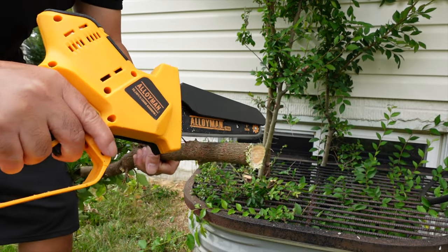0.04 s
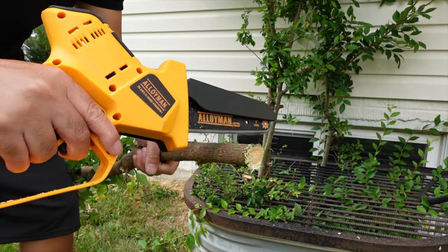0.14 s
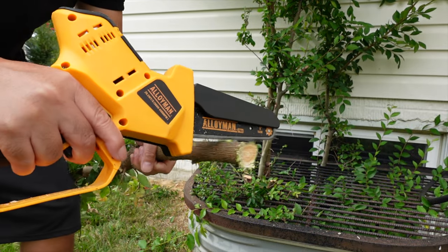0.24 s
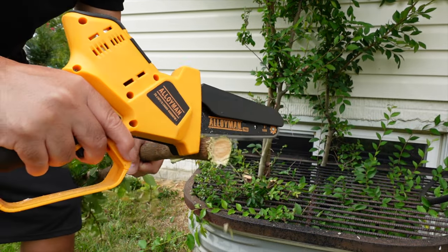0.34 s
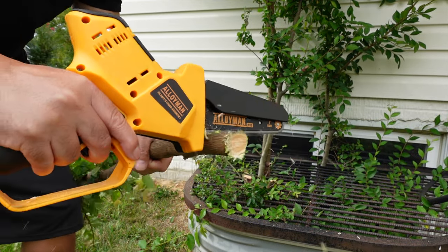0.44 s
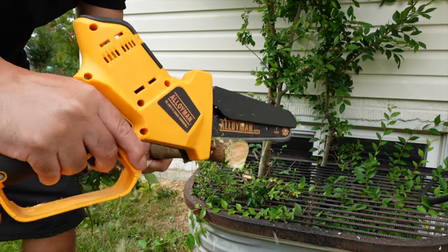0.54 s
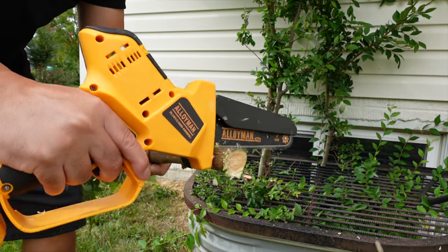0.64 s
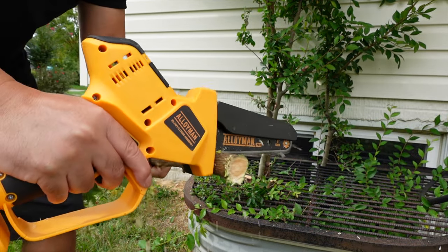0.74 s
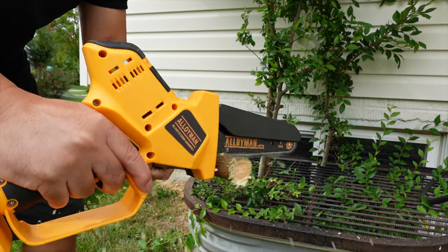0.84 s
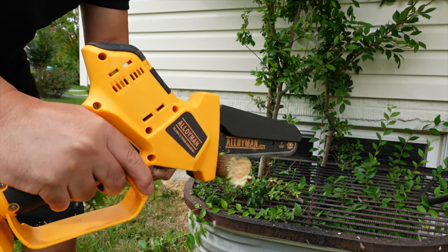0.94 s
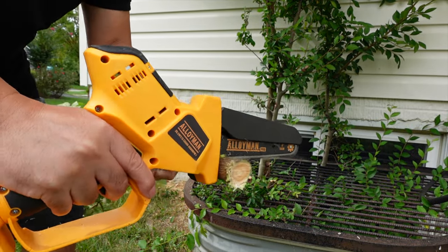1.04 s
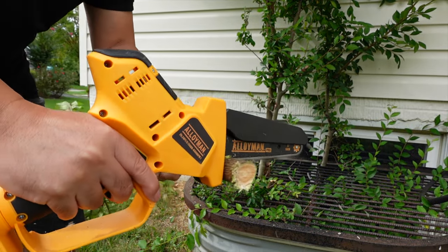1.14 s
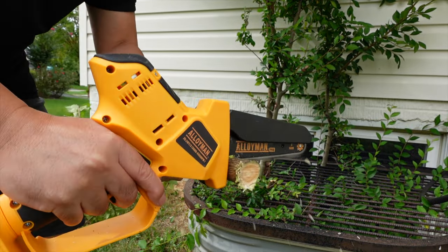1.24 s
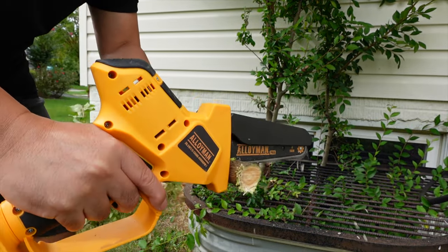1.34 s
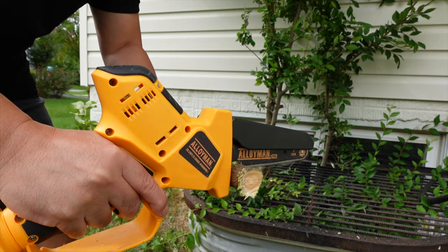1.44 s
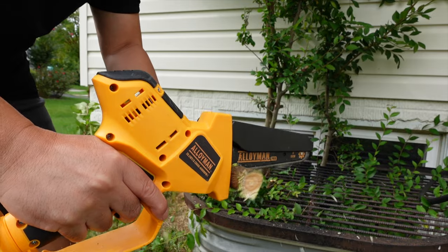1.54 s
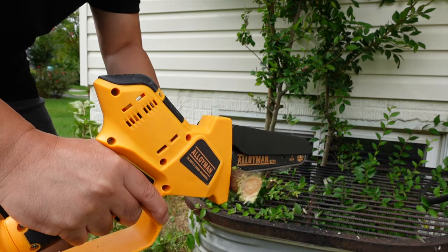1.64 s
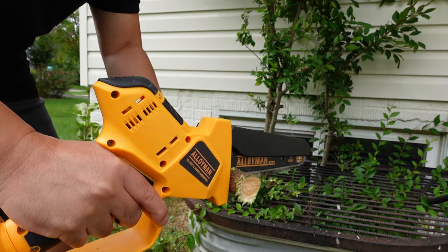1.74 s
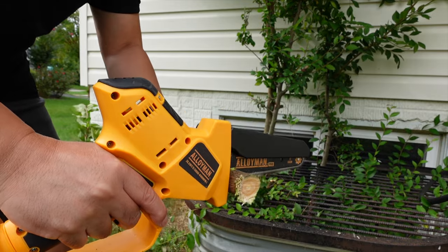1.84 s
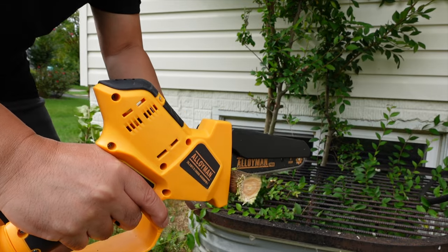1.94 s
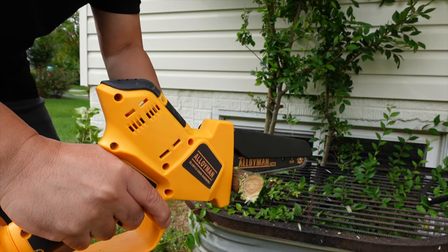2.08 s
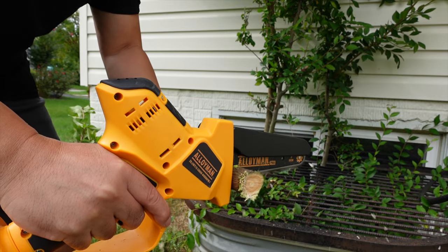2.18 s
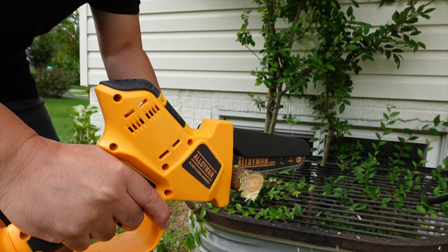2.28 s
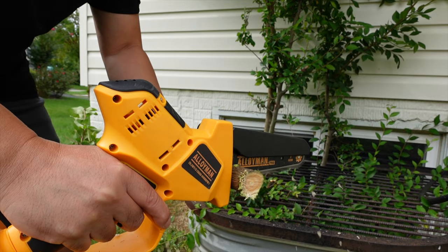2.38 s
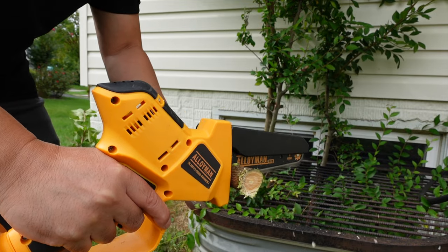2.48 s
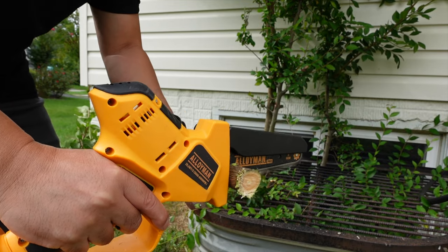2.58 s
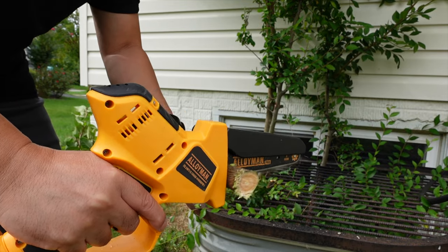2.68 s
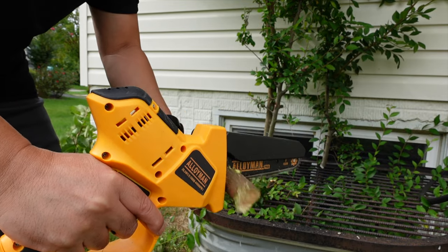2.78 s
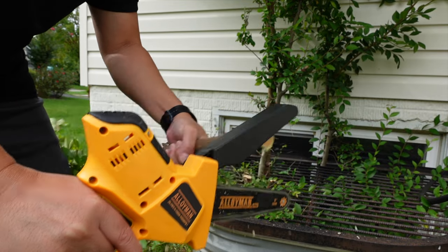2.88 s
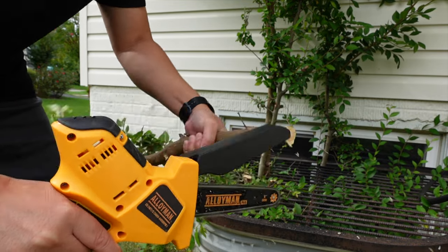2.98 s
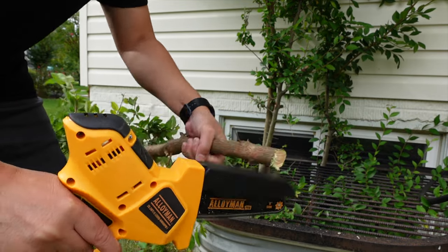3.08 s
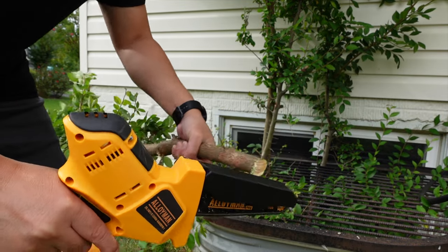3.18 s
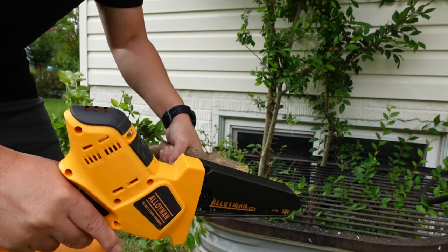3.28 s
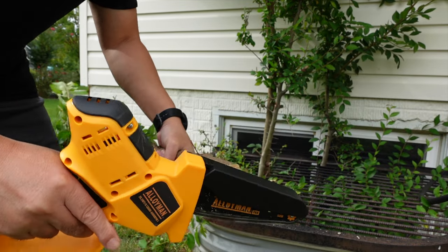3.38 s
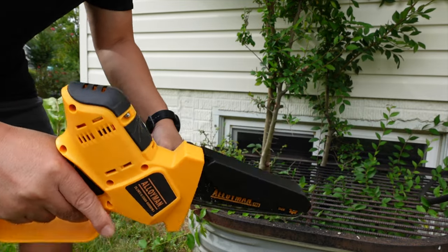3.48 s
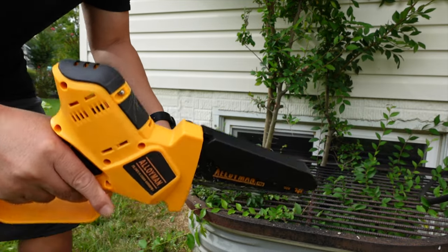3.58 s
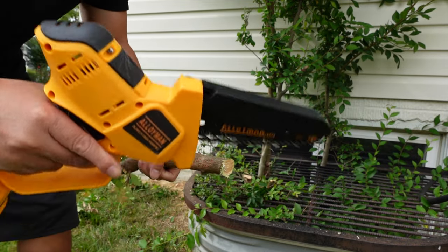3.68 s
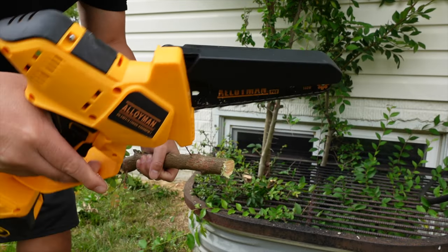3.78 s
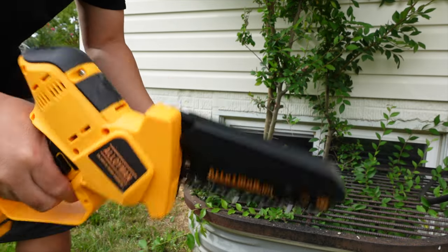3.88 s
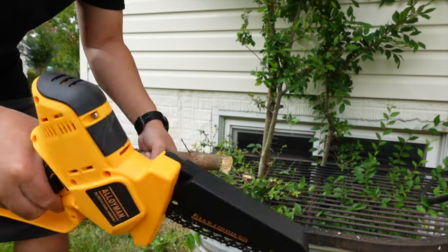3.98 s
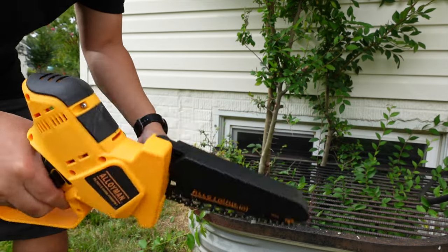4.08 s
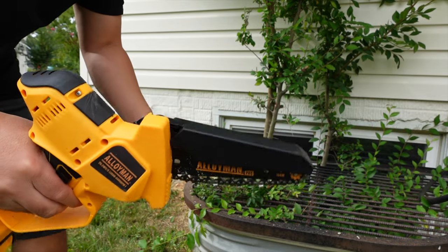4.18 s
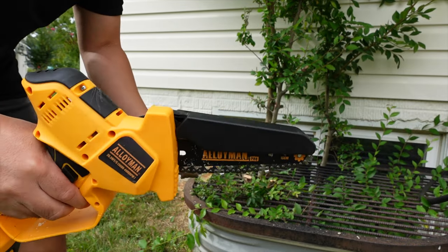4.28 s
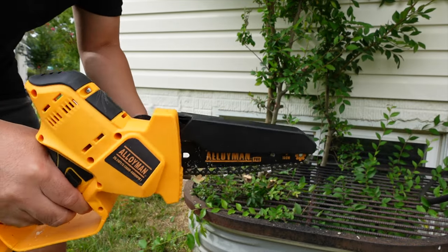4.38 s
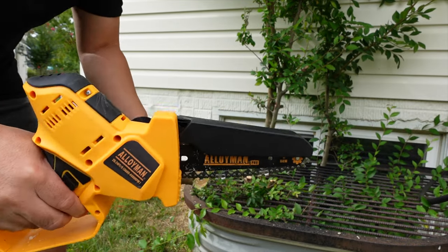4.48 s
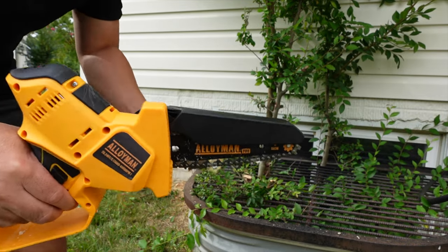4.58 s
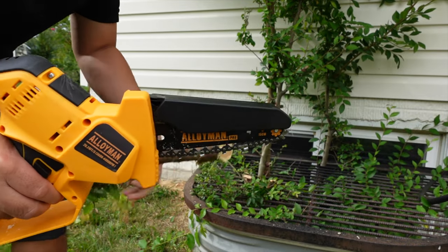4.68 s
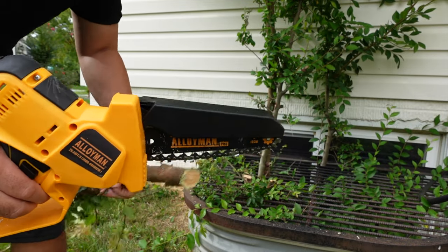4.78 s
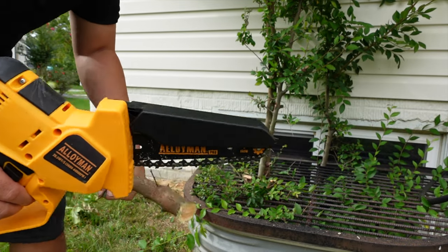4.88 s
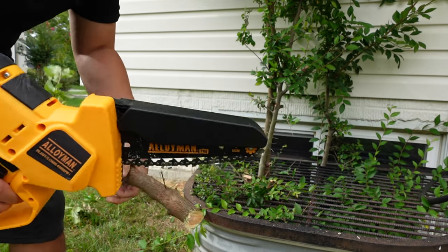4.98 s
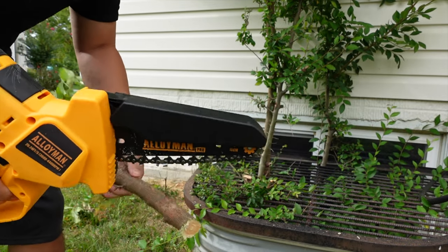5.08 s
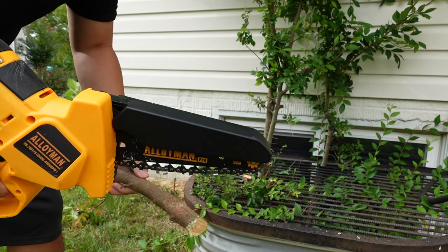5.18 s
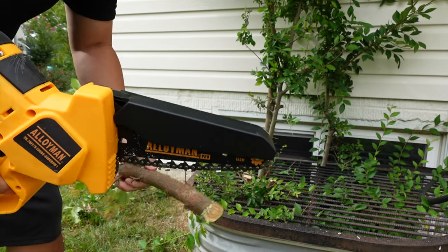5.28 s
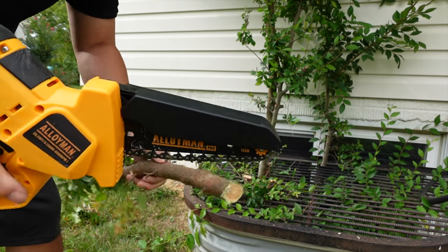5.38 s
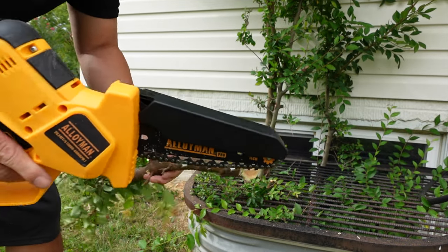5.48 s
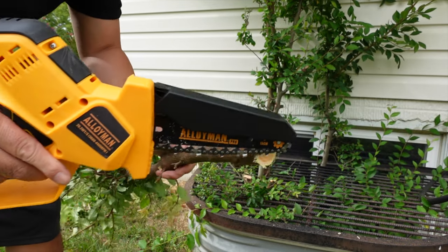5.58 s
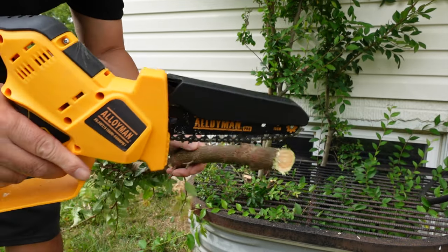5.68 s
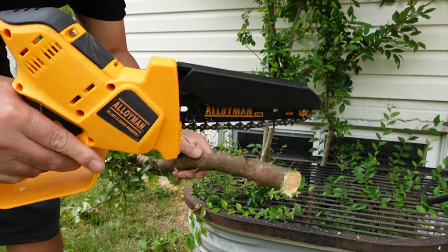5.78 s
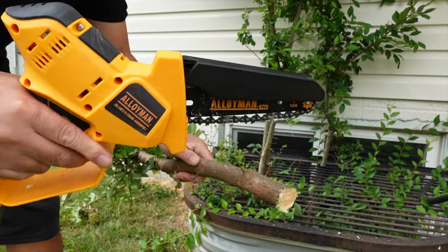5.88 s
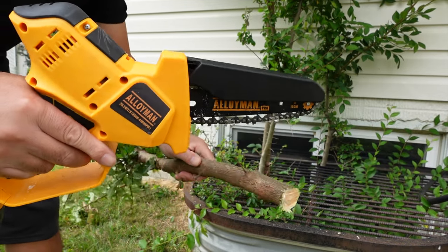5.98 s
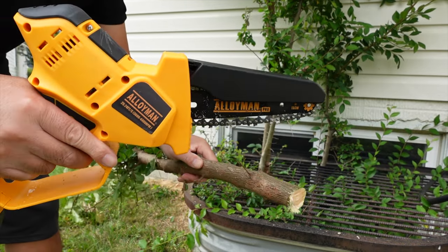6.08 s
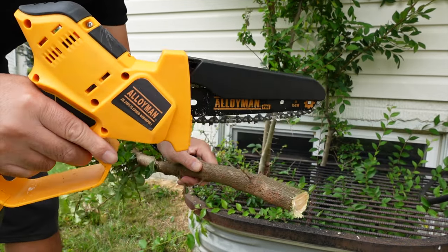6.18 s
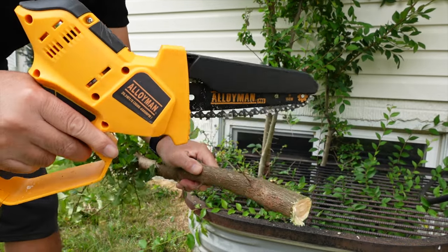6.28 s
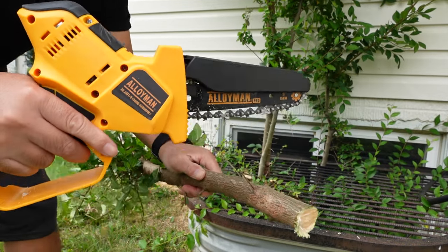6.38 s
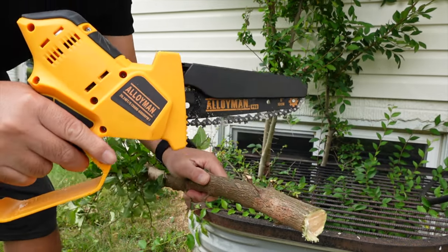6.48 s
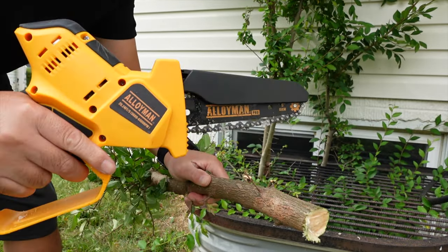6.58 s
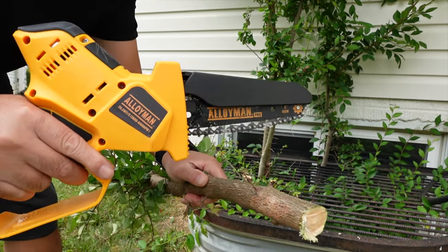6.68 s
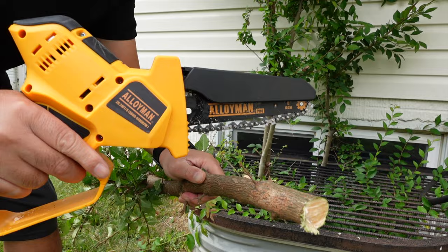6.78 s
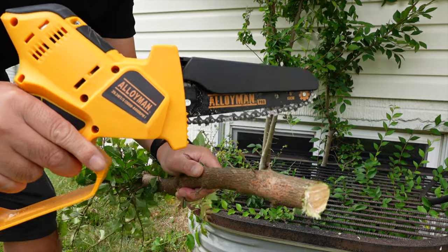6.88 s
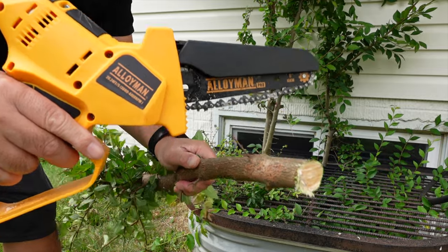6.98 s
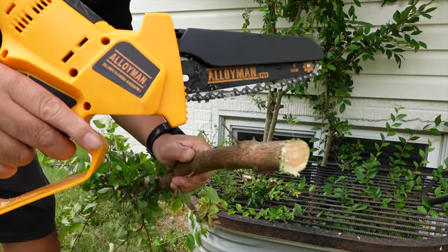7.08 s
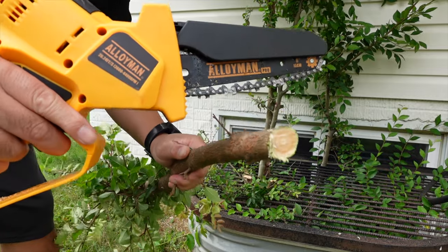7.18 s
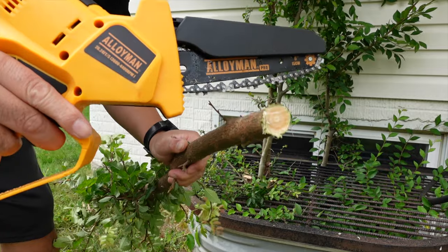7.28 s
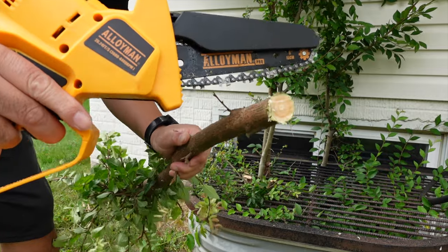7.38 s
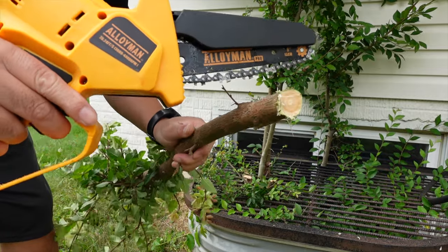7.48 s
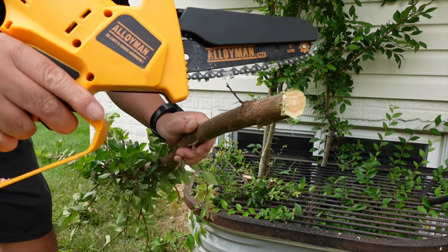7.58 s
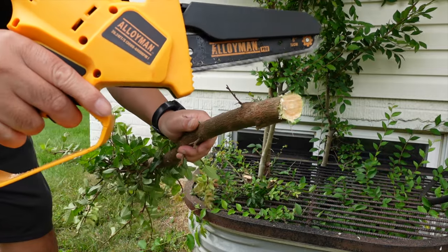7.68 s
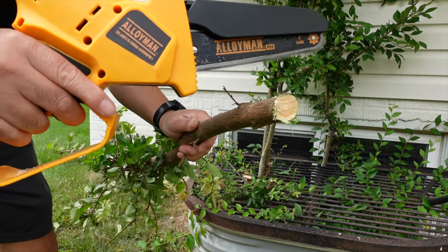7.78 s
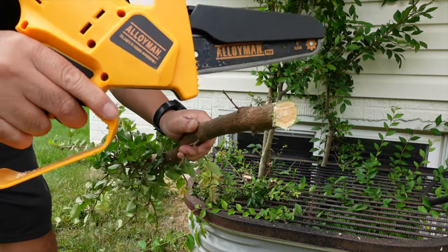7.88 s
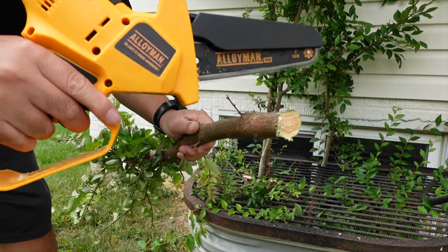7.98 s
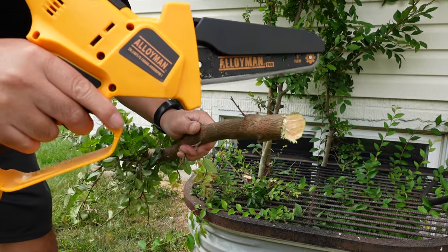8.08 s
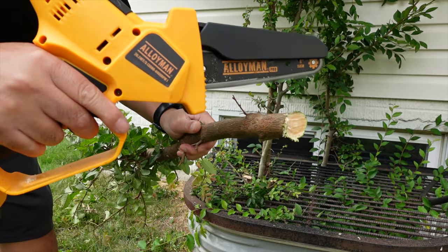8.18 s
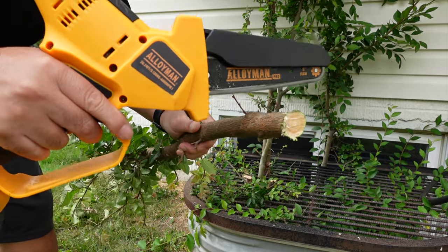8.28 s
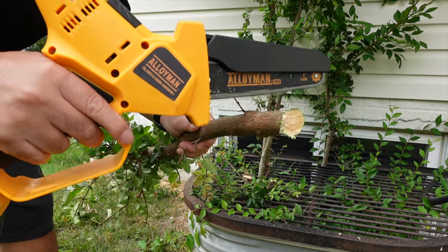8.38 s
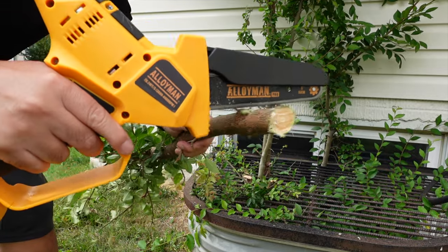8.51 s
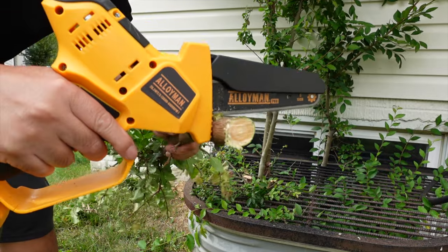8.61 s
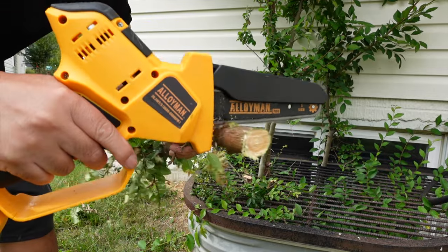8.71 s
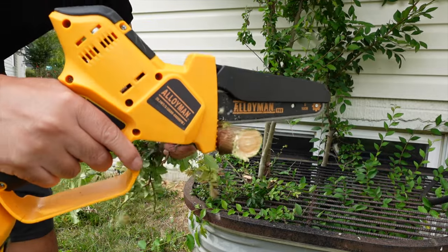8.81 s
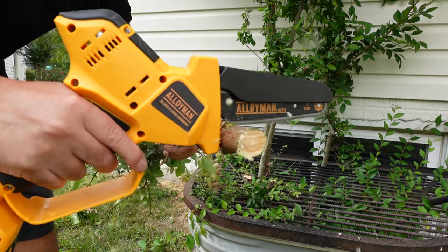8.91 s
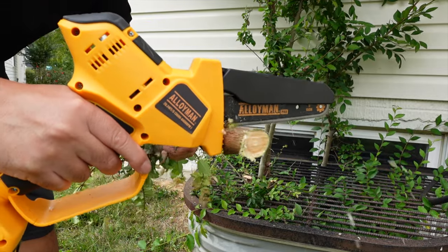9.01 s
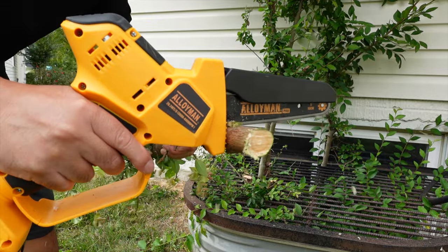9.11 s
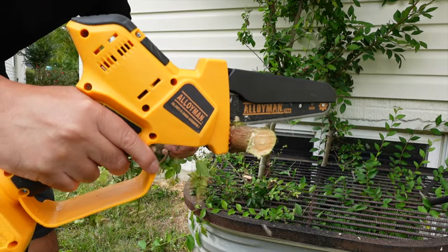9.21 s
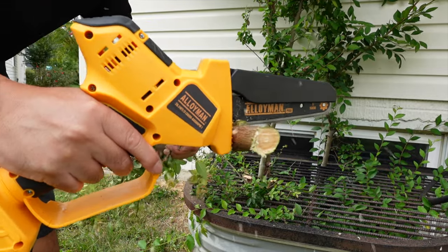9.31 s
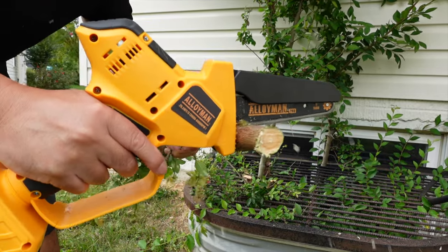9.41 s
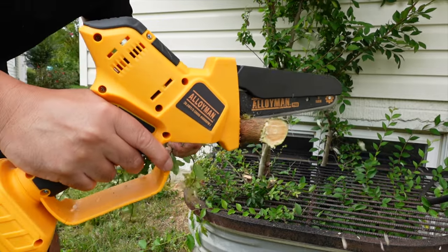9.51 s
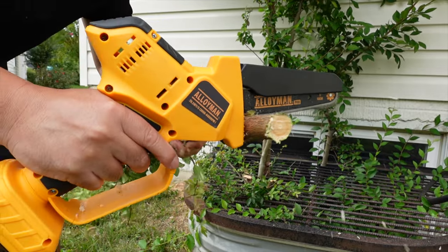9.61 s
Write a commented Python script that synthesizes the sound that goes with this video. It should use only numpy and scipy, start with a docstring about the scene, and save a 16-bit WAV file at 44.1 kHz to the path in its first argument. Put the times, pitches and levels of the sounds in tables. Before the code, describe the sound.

A small battery chainsaw rasps loudly through a branch, clatters to a stop, leaves rustle and twigs snap, then it restarts and cuts again.

```python
"""A small battery chainsaw, close by, cuts a thin branch, coasts to a stop, then starts and cuts again.
Its chain links are rows of noise blows, coloured by the ringing bar and housing; every second link
carries a tooth that knocks and rasps the wood. In the pause the leafy branch is shifted (shaped noise
and tiny grains), air bumps the microphone (low waves and noise), and a garden with a low hum is heard."""
import sys
import numpy as np
from scipy import signal
from scipy.fft import rfft, irfft, next_fast_len
from scipy.io import wavfile
from scipy.ndimage import uniform_filter1d, minimum_filter1d, map_coordinates

SR = 44100
rng = np.random.default_rng(int(sys.argv[2]) if len(sys.argv) > 2 else 0)


def inscribe(sig):
    """Save sig as 16-bit PCM at rate SR to the path in sys.argv[1].

    A 1-D sig is mono; a 2-D sig holds one channel per row.
    Samples are clipped to [-1, 1] before scaling.
    """
    pcm = np.round(np.clip(np.atleast_2d(sig).T, -1, 1) * 32767)
    wavfile.write(sys.argv[1], SR, pcm.astype(np.int16))


N = 425565

# runs of the saw: (trigger pressed [s], released [s], chain level before load [dB], steel sizzle before
# damping [dB], share of rasp with the chain free [0-1], ring of the side facing the microphone [Hz])
SAW_RUNS = [(-1, 3.3, -11.1, -10.7, .45, 4600), (7.75, 11, -10.8, -9.8, .05, 3400)]
# colour of the free chain: (frequency [Hz], level [dB per Hz])
CHAIN_COLOUR = [(30, -41), (300, -33.5), (430, -28), (520, -14.5), (950, -5), (1170, -13), (1500, -2),
                (2100, -9), (2800, -3.5), (3350, 3), (4100, -4.5), (5200, -4.5), (6800, -6), (11000, -19.5)]
# colour of the knocked branch: (frequency [Hz], level [dB per Hz])
BRANCH_COLOUR = [(100, -33), (280, -25), (400, -10.5), (520, -2), (630, -0.5), (820, 0.5), (1000, -4),
                 (1200, -13), (2000, -40)]
# ringing of the bar and housing: (frequency [Hz], width [Hz], lift [dB])
HOUSING_RINGS = [(1798, 32, -4.5), (2490, 65, -0.5), (2615, 50, 0), (3380, 150, 0.5), (3680, 100, 0),
                 (3985, 47, 3.5), (4340, 110, 1.5), (4920, 150, 1), (5720, 180, 2), (8250, 400, 2),
                 (9350, 160, 0.5)]


def saw():
    """Links clatter on the sprocket, steel slides in the bar, teeth chop the branch and the drive whines."""
    # colour of the rasp in the cut: (frequency [Hz], level [dB per Hz])
    rasp_colour = [(30, -39), (300, -35.5), (800, -8.5), (1200, -14), (1520, -2), (1950, -9.5),
                   (2400, -2.5), (3400, -3), (4450, 0), (5300, -5), (6300, -10.5), (8500, -14),
                   (12000, -19.5)]
    # colour of the sliding steel: (frequency [Hz], level [dB per Hz])
    steel_colour = [(4000, -40), (7200, -13), (8200, -4), (9400, -3), (10500, -7), (12500, -6), (13600, 0),
                    (14300, .5), (14800, -1), (15600, 0)]
    # how hard the hand leans on each cut, one list a cut: (time [s], wood knock level [dB])
    hand_push = [
        [(0, -31), (.3, -35), (.47, -24), (1.15, -20.3), (1.52, -21.5), (1.58, -16), (1.85, -21), (2.25, -24.5),
         (2.85, -21), (3.1, -34)],
        [(8.45, -36), (8.62, -24), (8.9, -21.7), (9.2, -20), (9.65, -18.5)],
    ]
    links_per_s, sag_share = 250, .025  # free speed; part of it lost in the widest wood
    # each sound grows as this power of the chain speed
    chain_power, knock_power, sizzle_power = 1.4, .5, 2.05

    t = np.arange(N) / SR
    pace = np.clip(drive(), 0, 1)
    width, damp_db, load_db, cut_rasp = kerf()
    pressed, _, *settings, _ = np.transpose(SAW_RUNS)
    run = np.searchsorted(pressed, t) - 1
    run_db, sizzle_db, free_rasp = np.array(settings)[:, run]
    rasp_share = np.clip(free_rasp + cut_rasp, 0, 1)
    knock_db, = curves(np.vstack(hand_push))

    # travel counts the links that have gone by; the floor on speed avoids dividing by zero
    speed = links_per_s * np.maximum(pace, .1) * (1 - sag_share * width)
    unsteady = 1 + (.003 + .02 * width) * wobble(14)
    travel = np.cumsum(speed * unsteady) / SR
    links = strikes(travel, speed, t60=.02, scatter_db=1.8, worn_db=2, jitter=.05, count=40)
    teeth = strikes(travel / 2, speed / 2, t60=.029, scatter_db=1.5, worn_db=2, jitter=.06, count=20)
    # the bar chatters in the cut, so the teeth bite in clumps
    bites = teeth * unit(amp(1.8 * wobble(70)))

    clatter = colour(grit(links, share=.5 * pace), CHAIN_COLOUR, HOUSING_RINGS)
    free = np.sqrt(1 - rasp_share) * clatter
    scrape = colour(grit(bites, share=.75 * np.sqrt(pace)), rasp_colour, HOUSING_RINGS)
    rasp = np.sqrt(rasp_share) * scrape
    chain = facing(amp(2) * free + amp(1.57) * rasp, run)
    # slow links land softly: they are quieter, and their top goes first
    soft = signal.sosfiltfilt(signal.butter(3, 5400, fs=SR, output="sos"), chain)
    chain = pace ** chain_power * (soft + pace ** .6 * (chain - soft))

    uneven_bites = bites * unit(amp(1.7 * wobble(34)))
    knock = pace ** knock_power * colour(grit(uneven_bites, share=.96 * pace), BRANCH_COLOUR)
    contacts = np.sqrt((1 - rasp_share) * links ** 2 + rasp_share * bites ** 2)
    sliding = colour(grit(contacts, share=.86 * pace), steel_colour, HOUSING_RINGS)
    sizzle = pace ** sizzle_power * sliding

    loud_part = amp(run_db + load_db) * (chain + whine(travel, pace, width))
    knock_part = amp(knock_db) * knock
    sizzle_part = amp(sizzle_db - damp_db + .5 * wobble(11)) * sizzle
    # the slack chain swings about, so the whole sound flutters
    flutter = amp(whip() + .55 * wobble(45) + .2 * wobble(12))
    return flutter * (loud_part + knock_part + sizzle_part)


def drive():
    """Chain speed as a share of full: it leaps up at the trigger, and friction runs it down evenly."""
    spin_up_s, coast_s = .012, .735  # time constant of the start; time to run down
    t = np.arange(N) / SR
    pace = np.zeros(N)
    for pressed, released, *_ in SAW_RUNS:
        start = 1 - np.exp(-np.maximum(t - pressed, 0) / spin_up_s)
        pace += start * np.clip(1 - (t - released) / coast_s, 0, 1)
    return pace


def kerf():
    """The cut widens to the middle of the round branch and narrows again, changing load, damping and rasp."""
    # passes through the branch: (teeth enter [s], time to get through [s], then at the widest:
    # sizzle damped [dB], chain louder [dB], added share of rasp [0-1])
    passes = [(.05, 2.9, 11, 1.2, .42), (8.45, 2.6, 5.5, .1, .3)]
    t = np.arange(N) / SR
    enter, length, damp_db, load_db, rasp = np.transpose(passes)
    progress = np.clip((t[:, None] - enter) / length, 0, 1)
    width = np.abs(np.sin(np.pi * progress))
    return width.sum(1), width ** 3 @ damp_db, width @ load_db, np.cbrt(width) @ rasp


def strikes(travel, speed, t60, scatter_db, worn_db, jitter, count):
    """Envelope (rms about 1) of one blow per step of travel; count unequal links come round again and again."""
    place = travel + jitter * wobble(200) + 2
    link = np.maximum(place, 0).astype(int)
    worn = amp(worn_db * unit(rng.standard_normal(count))[link % count])
    scatter = amp(scatter_db * rng.standard_normal(link.max() + 1)[link])
    since_blow = (place % 1) / speed  # seconds
    blows = worn * scatter * amp(-60 * since_blow / t60)
    # even out the level over a sixteenth of a second
    return blows / np.sqrt(np.abs(uniform_filter1d(blows ** 2, SR // 16)) + 1e-9)


def grit(envelope, share):
    """Noise with a share of its power in the blows and the rest in steady sliding."""
    share = np.clip(share, 0, 1)
    return noise() * np.sqrt(1 - share + share * envelope ** 2)


def whine(travel, pace, width):
    """Drive tones locked to the link rate, clear only at full speed and out of the wood."""
    # (multiple of the link rate, level before a 3 dB lift [dB])
    whine_tones = [(1, -42), (2, -24), (2.43, -31), (4, -29), (5, -27.5), (6, -26), (7.19, -23),
                   (9.96, -24)]
    tones = np.zeros(N)
    for order, db in whine_tones:
        phase = 2 * np.pi * order * travel + .2 * wobble(50)
        tones += amp(db + 3 + 1.5 * wobble(12)) * np.sin(phase)
    return (1 - width) ** 2 * pace ** 16 * tones


def whip():
    """Swing of the level in dB as the chain whips on breaking out of the wood, then settles."""
    start_s, rate_hz, depth_db, fade_s = 3.015, 7, 4, .3
    age = np.maximum(np.arange(N) / SR - start_s, 0)
    return -depth_db * np.sin(2 * np.pi * rate_hz * age) * np.exp(-age / fade_s)


def facing(x, run):
    """The saw is held at a new angle for each run, which brings out another ring of its housing."""
    rings = []
    for *_, ring_hz in SAW_RUNS:
        b, a = signal.iirpeak(ring_hz, 2.6, fs=SR)
        rings.append(signal.lfilter(b, a, x))
    return x + .13 * np.choose(run, rings)


def clacks():
    """Slack links ring the bar and housing; a grabbing tooth jolts the branch."""
    # slack links slapping as the chain runs down, and the trigger's click before it is taken up again: (time
    # [s], level before trim [dB])
    slap_times = [(3.763, -11), (3.869, -15), (3.903, -13), (3.912, -14), (3.988, -30), (7.747, -15)]
    # teeth grabbing hard: (time [s], level before trim [dB])
    grab_times = [(.912, -7), (1.01, -10), (1.378, -8), (1.552, -7), (2.148, -9), (2.818, -6),
                  (8.868, -6.5), (8.896, -8), (9.035, -10), (9.21, -7), (9.257, -3)]
    slaps, jolts = np.zeros((2, N))
    for s, db in slap_times:
        add(slaps, s, amp(db - 5) * burst(t60=.017, attack=.0003))
    for s, db in np.vstack(grab_times):
        add(jolts, s, amp(db - 4) * burst(t60=.07, attack=.003))
    return colour(slaps, CHAIN_COLOUR, HOUSING_RINGS) + colour(jolts, BRANCH_COLOUR)


def shifted_branch():
    """Leaves rustle and crackle, bark scuffs in the hand, and twigs tap and snap."""
    # strokes of the branch: (start [s], length [s], leaf rustle [dB], bark scuff [dB])
    strokes = [(4.33, .12, -66, -66), (4.637, .17, -52, -51), (4.743, .2, -52, -59), (4.992, .11, -58, -46),
               (5.066, .32, -61, -51.5), (5.369, .058, -49.5, -60), (5.455, .0813, -57, -48),
               (5.6, .16, -61, -55), (5.72, .7, -64, -59), (6.65, .093, -57, -63), (6.84, .3, -61.5, -58),
               (7.47, .11, -60, -62)]
    # taps and twig snaps, before trim: (time [s], snap [dB], dull knock [dB], bright tick [dB])
    tap_times = [(4.7554, -47, -35, -45.5), (4.8309, -29.5, -55, -50), (5.1811, -37.5, -53.5, -57),
                 (5.3966, -39, -58, -66), (5.4859, -29, -47, -59), (5.682, -31, -47.5, -65.5),
                 (5.7149, -28.5, -48, -57), (6.9217, -35, -43, -65.5), (7.1402, -42, -57.5, -56.5),
                 (7.4814, -47, -56, -52), (7.6879, -42, -55, -74)]
    # colours of the leaves, bark, snaps and ticks, each: (frequency [Hz], level [dB per Hz])
    leaf_colour = [(1000, -10), (2800, 1), (5000, 0), (7000, 0.5), (10500, -6), (14000, -2), (16000, -6)]
    bark_colour = [(300, -7), (780, 2.5), (1300, -8), (2500, -19.5), (8000, -46.5)]
    snap_colour = [(700, -5.5), (1400, 0.5), (3300, 2), (6000, -4.5), (9000, -17.5), (14000, -27.5)]
    tick_colour = [(3000, -29), (6500, -10), (11000, -2), (14000, 0.5)]
    sweep, rub, snaps, knocks, ticks = np.zeros((5, N))
    for s, length, leaf_db, scuff_db in strokes:
        stroke = signal.windows.tukey(int(length * SR), .85)
        add(sweep, s, amp(leaf_db) * stroke)
        add(rub, s, amp(scuff_db) * stroke)
    for s, db, knock_db, tick_db in tap_times:
        add(snaps, s, amp(db - 8.5) * burst(t60=.055, attack=.001))
        add(knocks, s, amp(knock_db + 7) * burst(t60=.035, attack=.0005))
        add(ticks, s, amp(tick_db + 6.5) * burst(t60=.03, attack=.00026))
    rustle = .93 * noise() * amp(1.5 * wobble(60))
    leaves = sweep * (rustle + .5 * crackle(rate=1700, spread_db=4.5))
    bark = rub * noise() * amp(1.5 * wobble(36))
    leafy = colour(leaves, leaf_colour, [(2880, 250, 3.5), (4900, 400, 3)])
    woody = colour(bark + knocks, bark_colour, [(3620, 150, 15)])
    return leafy + woody + colour(snaps, snap_colour) + colour(ticks, tick_colour)


def crackle(rate, spread_db):
    """Sparse grains of very unequal size (rms 1), rate a second, each a few cycles at its own pitch."""
    count = int(rate * N / SR)
    t = np.arange(128) / SR
    start = rng.integers(0, N, (count, 1))
    hz = rng.uniform(2000, 15000, (count, 1))
    size = amp(spread_db * np.minimum(rng.exponential(size=(count, 1)), 4))
    grains = size * np.sin(2 * np.pi * hz * t) * np.exp(-t * hz / 3)
    places = start + np.arange(len(t))
    return unit(np.bincount(places.ravel(), grains.ravel(), N)[:N])


def surroundings(x):
    """Near surfaces return weak copies whose delays drift as the hand moves."""
    # echoes off the arm, the fire pit, the ground and the house wall: (delay [s], level [dB])
    echoes = [(.0017, -22.5), (.0031, -18.5), (.0052, -19.5), (.0098, -23)]
    n = np.arange(N)
    total = x.copy()
    for delay, db in echoes:
        drifting = delay + .00006 * wobble(2)
        total += amp(db) * map_coordinates(x, [n - SR * drifting], order=3)
    return total


def air_bumps():
    """Gusts rumble on the microphone; each hard eddy pushes it for a few low, uneven cycles."""
    # hardest eddies: (time [s], level before trim [dB])
    eddies = [(4.483, -22), (4.504, -16.5), (4.548, -15), (4.727, -25), (4.836, -22.5), (4.894, -28),
              (4.934, -24.5), (5.147, -30.5), (5.338, -30), (5.403, -29), (5.449, -29)]
    # gusts: (start [s], length [s], level [dB])
    gust_times = [(4.4, .24, -39), (4.64, .36, -41), (5.27, .4, -41.5), (6.43, .16, -50)]
    pushes, swirl = np.zeros((2, N))
    t = np.arange(SR // 8) / SR
    for s, db in eddies:
        pitch, phase = rng.standard_normal(2)
        hz = 135 * np.exp(.2 * pitch)
        push = np.sin(2 * np.pi * (hz * t + phase))
        swell = t / .0067 * np.exp(1 - t / .0063)
        add(pushes, s, amp(db - 6) * swell * push)
        add(swirl, s, amp(db - 2.5) * burst(t60=.088, attack=.004))
    wind = np.zeros(N)
    for s, length, db in gust_times:
        add(wind, s, amp(db) * signal.windows.hann(int(length * SR)))
    gusty = wind * noise() * amp(3 * wobble(30))
    rumble = colour(gusty, [(30, -14), (100, 8), (180, 3), (300, -10), (600, -35), (3000, -70)])
    swirl = colour(swirl, [(30, -14), (100, 8), (280, .5), (500, -17), (1100, -50), (6000, -77.5)])
    return pushes + rumble + swirl


def garden():
    """Outdoor air with a thin band of insect hiss, a far machine's hum and a few faint bird notes."""
    # colour of the air: (frequency [Hz], level [dB per Hz])
    air_colour = [(15, -52.5), (25, -25), (126, -0.5), (165, -9.5), (241, -7), (299, -11), (513, -10.5),
                  (672, -8.5), (769, -11.5), (1590, -18.5), (2090, -24.5), (5670, -33.5), (15800, -44)]
    # loudness of the hum: (time [s], level [dB])
    hum_level = [(3.15, -52), (3.3, -45), (4.4, -52), (5.8, -58), (6.8, -70), (7.4, -54)]
    # faint steady tones: (frequency [Hz], level [dB])
    drone_tones = [(234, -60.5), (361, -61.5), (678, -65)]
    # far bird notes: (time [s], level before trim [dB])
    bird_notes = [(6.0, -55), (6.06, -61), (6.12, -53.5), (6.22, -56.5)]
    t = np.arange(N) / SR
    breeze = noise() * amp(.8 * wobble(5))
    air = amp(-51.5) * colour(breeze, air_colour, [(5780, 350, 5.5), (14300, 2900, 5)])
    hum_db, = curves(hum_level)
    hum = amp(hum_db + 1.3 * wobble(8)) * np.sin(2 * np.pi * 117 * t + .6 * wobble(36))
    drone = np.zeros(N)
    for hz, db in drone_tones:
        phase = 2 * np.pi * hz * t + hz / 200 * wobble(30)
        drone += amp(db + 2.5 * wobble(4)) * np.sin(phase)
    calls = np.zeros(N)
    for s, db in bird_notes:
        add(calls, s, amp(db + 6.5) * burst(t60=.15, attack=.012))
    birds = colour(calls, [(1200, -50), (1900, 0), (3000, -49)], [(1900, 200, 12)])
    return air + hum + drone + birds


def amp(db):
    """Decibels to gain."""
    return 10 ** (np.asarray(db) / 20)


def unit(x):
    """Scale to rms 1."""
    return x / np.sqrt(np.mean(x ** 2) + 1e-20)


def curves(rows):
    """One value per sample for each column after the time."""
    s, *columns = np.transpose(rows)
    return [np.interp(np.arange(N) / SR, s, column) for column in columns]


def wobble(rate):
    """A smooth random curve through rate random points a second."""
    knots = rng.standard_normal(int(N * rate / SR) + 4)
    return map_coordinates(knots, [np.arange(N) * rate / SR])


def noise():
    """White noise of rms 1."""
    return rng.standard_normal(N)


def colour(x, points, resonances=()):
    """Causal filter of unit power gain from (Hz, dB) points, lifted at (Hz, width Hz, dB) resonances."""
    size = 8192
    hz = np.fft.rfftfreq(size, 1 / SR)
    f, level = np.transpose(points)
    db = np.interp(np.log(hz + 1), np.log(f), level)
    for centre, width, lift in resonances:
        db = db + lift / (1 + (2 * (hz - centre) / width) ** 2)
    # folding the cepstrum makes the filter respond as early as it can (minimum phase)
    cepstrum = irfft(np.log(amp(db)))
    cepstrum[1:size // 2] *= 2
    cepstrum[size // 2 + 1:] = 0
    response = irfft(np.exp(rfft(cepstrum)))
    return signal.fftconvolve(x, response / np.linalg.norm(response))[:N]


def add(track, s, sound):
    """Mix a sound into the track at time s."""
    part = track[round(s * SR):][:len(sound)]
    part += sound[:len(part)]


def burst(t60, attack):
    """A puff of noise that rises and dies away by 60 dB in t60 seconds."""
    t = np.arange(SR // 4) / SR
    return rng.standard_normal(len(t)) * amp(-60 * t / t60) * (1 - np.exp(-t / attack))


def scene():
    """Saw and branch with their near echoes, air bumps and garden at one microphone."""
    near = surroundings(saw() + clacks() + shifted_branch())
    return (near + air_bumps() + garden())[None]


def record(dry):
    """A fast limiter holds the peaks, what passes is rounded off at full scale, and a steep filter ends the treble."""
    needed = np.minimum(1, 1.25 / (np.abs(dry) + 1e-9))
    held = dry * uniform_filter1d(minimum_filter1d(needed, size=41), size=41)
    rounded = held / (1 + np.abs(held) ** 12) ** (1 / 12)
    size = next_fast_len(N + SR // 2)
    hz = np.fft.rfftfreq(size, 1 / SR)
    passband = .5 - .5 * np.tanh((hz - 15830) / 60)  # treble ends at 15830 Hz
    return irfft(rfft(rounded, size) * passband, size)[..., :N]


dry = scene()
out = record(dry)
inscribe(out)
```